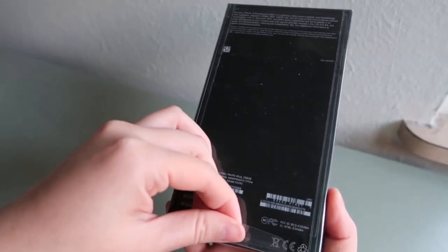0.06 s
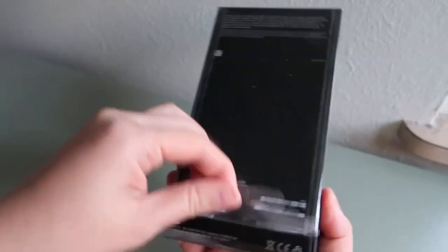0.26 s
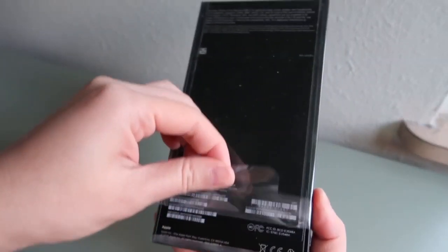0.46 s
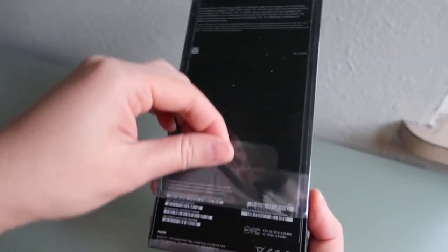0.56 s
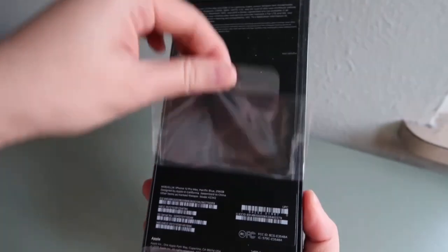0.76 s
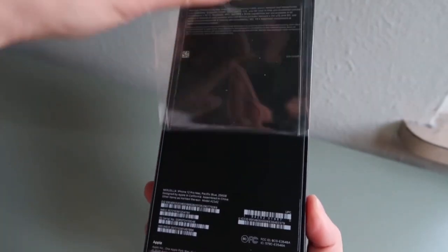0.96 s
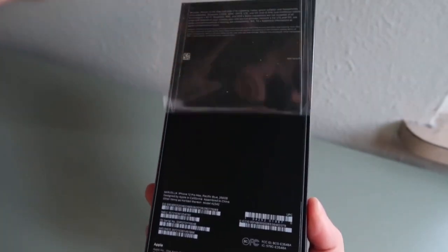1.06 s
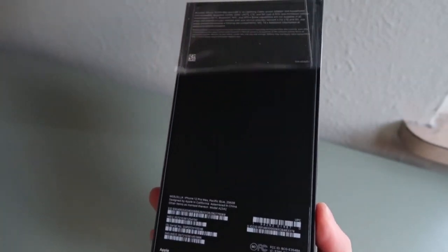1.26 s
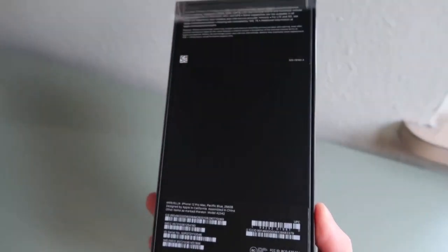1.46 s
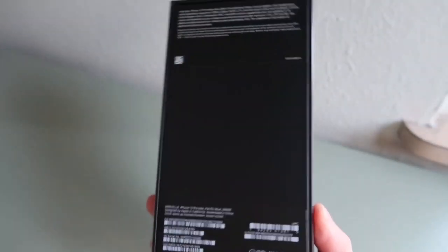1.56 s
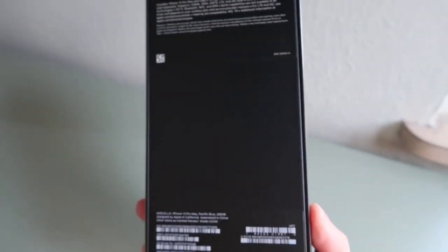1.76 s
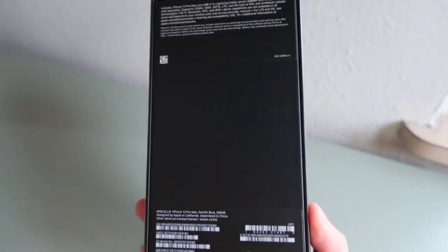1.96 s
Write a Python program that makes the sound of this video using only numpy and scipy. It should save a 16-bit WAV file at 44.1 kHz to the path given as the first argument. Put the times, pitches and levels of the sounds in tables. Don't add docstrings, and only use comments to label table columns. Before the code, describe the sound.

Protective plastic film peels off a small cardboard box, heard close in stereo in a small quiet room. A faint finger brush comes near 0.1 s, then a loud bright snap at 0.23 s and a dull creak. From 0.5 to 1.3 s, irregular sharp ticks ride a soft rustle; a stretching whisper rises to a crackling crunch and low thump at 1.55 s, a slump, then a faint brush near 1.9 s.

```python
import sys
import numpy as np
from scipy import signal
from scipy.fft import rfft, irfft
from scipy.io import wavfile
from scipy.ndimage import uniform_filter1d

SR = 44100
rng = np.random.default_rng(int(sys.argv[2]) if len(sys.argv) > 2 else 0)


def boost_factor(decibels):
    exponent = np.asarray(decibels, float) / 20
    return 10 ** exponent


def wrap_up_sound(samples):
    columns = np.atleast_2d(samples).T
    tamed = np.clip(columns, -1, 1)
    steps = np.round(tamed * 32767).astype(np.int16)
    wavfile.write(sys.argv[1], SR, steps)


N = 88200
HZ = np.arange(N + 1) * SR / (2 * N) + 1

# start in
# seconds, peak level in dB, film pitch in Hz, second pitch in Hz, treble in dB.
PEEL_CRACKS = [(0.2289, -29.5, 8200, 6050, -11), (0.2329, -6, 3030, 4200, -17),
               (.2360, -0.5, 6060, 3890, -24), (0.2427, -3, 4000, 7220, -12), (0.2468, -4, 3220, 2050, -13),
               (.2495, -9, 3050, 2170, -13), (.2512, -13, 1045, 1950, -14), (0.257, -50, 2000, 3200, -14),
               (0.263, -37, 3200, 1820, 0), (0.2761, -22, 1120, 3180, -30), (0.3303, -26, 4690, 950, -14.5),
               (0.3558, -29, 3180, 4460, -24), (.3700, -21, 3280, 3300, -37),
               (0.4683, -18, 3090, 2150, -16.5), (0.4899, -21, 2210, 3120, -11),
               (0.5639, -27.5, 4000, 4200, -16), (0.6094, -32, 3300, 4270, -3.5),
               (0.6253, -19.5, 3470, 4230, -14), (0.6762, -16.5, 3540, 2480, -8.5),
               (0.685, -17, 3140, 2640, -14), (0.7449, -28.5, 2170, 3650, -3.5),
               (0.8113, -11.5, 2660, 3550, -16), (0.8109, -18, 1510, 4060, -16),
               (0.838, -36, 2820, 2200, -19.5), (.9214, -11, 2810, 3520, -14.5),
               (.9317, -13, 3450, 2590, -10), (0.9358, -18.5, 3300, 2850, -9.5),
               (1.006, -23.5, 5100, 7670, -10), (1.0492, -13, 3800, 2450, -9),
               (1.0503, -25.5, 6000, 910, -11.5), (1.1, -19, 5530, 6140, -8),
               (1.1493, -12.5, 2970, 5500, -13), (1.162, -21, 3030, 4330, -11),
               (1.171, -21.5, 4380, 2770, -4), (1.2409, -30, 4600, 3000, -2.5),
               (1.2546, -14.5, 2970, 5400, -10.5), (1.2718, -23, 4650, 2990, -7)]
# start in seconds, peak level in dB, film pitch in Hz,
# second pitch in Hz, treble in dB.
CRUNCH_CRACKS = [(1.5054, -27, 2016, 1084, -21.5), (1.5129, -18, 4350, 5940, -13),
                 (1.5175, -15.5, 2360, 5225, -12), (1.5257, -8, 2425, 4280, -20),
                 (1.5311, -13.5, 1136, 2175, -31), (1.543, -22, 1858, 919, -31),
                 (1.5499, -18, 2760, 5370, -19), (1.5566, -11.5, 5390, 667, -27.5),
                 (1.5617, -14.5, 1660, 1100, -35.5), (1.5676, -8.5, 2950, 4070, -22.5),
                 (1.5694, -9.5, 970, 2120, -25.5), (1.577, -6.5, 3794, 1940, -27),
                 (1.5868, -14, 3820, 5600, -10), (1.5916, -23.5, 3660, 2510, -23),
                 (1.612, -23, 1010, 2400, -31), (1.6237, -22.5, 560, 2130, -40),
                 (1.6532, -23.5, 750, 570, -38.5), (1.660, -25.5, 565, 1700, -45)]
# frequency in Hz, level in dB.
FILM_COLOUR = [(300, -60.5), (700, -29), (1400, -1.5), (2500, 5), (4500, 2), (7000, 1), (10000, -46.5)]
# time in seconds, delay in seconds.
DESK_ECHO = [(.2, 0.0073), (.8, .0085), (1.05, 0.011), (1.16, 0.015), (1.25, 0.02)]
# time in seconds, level in dB.
PEEL_PULL = [(.47, -90), (.52, -81.5), (.6, -91), (.7, -72.5), (0.76, -69), (0.845, -59), (.9, -66.5),
             (0.974, -67), (1.058, -60), (1.212, -61.5), (1.3, -64.5), (1.4, -69), (1.5, -68.5)]
# frequency in Hz, level in dB per Hz.
RUSTLE_COLOUR = [(20, -17.5), (45, -0.5), (136, -9), (800, -19), (1400, -20.5), (3500, -19), (8000, -18),
                 (12500, -35)]
# frequency in Hz, width in Hz, level in dB.
FLUTTER_BANDS = [(130, 60, -3), (299, 140, -2.5), (485, 180, 3.5), (610, 240, -0.5)]
# frequency in Hz, width in Hz, level in dB.
STRETCH_BANDS = [(972, 130, -62), (2180, 490, -55.5), (5000, 450, -60), (5800, 650, -57.5),
                 (11500, 2000, -59.5)]
# time in seconds, level in dB.
STRETCH_SWELL = [(1.07, -14.5), (1.42, -7.5), (1.49, 3)]
# time in seconds, level in dB.
CRUNCH_FORCE = [(1.5, -42.5), (1.526, -15), (1.546, -21.5), (1.57, -7), (1.61, -38.5)]
# frequency in Hz, level in dB per Hz.
CRUNCH_COLOUR = [(24, -40), (40, -6.5), (850, -8), (1400, -7), (3000, -10), (6000, -15.5), (12800, -25.5),
                 (16000, -53.5)]
# frequency in Hz, width in Hz, level in dB.
BOX_MODES = [(109.8, 79, -4.5), (278, 48, 0.5), (559.7, 60, 6), (711, 100, 2), (1032, 60, 8.5),
             (1650, 150, -7.5), (2067, 100, 5.5)]
# time in seconds, level in dB.
SETTLE_FORCE = [(.25, -30), (.28, -48), (.34, -51), (.38, -50.5), (.42, -77)]
# frequency in Hz, level in dB per Hz.
SETTLE_COLOUR = [(300, -29.5), (600, -2.5), (1100, -1), (1600, -5), (2500, -14)]
# time in seconds, level in dB.
SLUMP_FORCE = [(1.6, -50), (1.62, -33), (1.645, -54), (1.655, -30.5), (1.68, -36), (1.74, -52)]
# frequency in Hz, level in dB per Hz.
SLUMP_COLOUR = [(18, -44), (30, 0.5), (206, -8), (567, -7), (802, -23), (1050, -11.5), (9000, -37),
                (14300, -60.5), (22000, -120)]
# time in seconds, level in dB.
BRUSH_STROKES = [
    [(.055, -78), (.075, -77.5), (.11, -83)],
    [(1.84, -82), (1.88, -75.5), (1.93, -80)],
]
# frequency in Hz, width in Hz, level in dB.
BRUSH_BANDS = [(1100, 183, -9.5), (1700, 760, -4.5), (2130, 1300, -9), (4200, 1700, -9), (186, 29, 0.5)]
# start in seconds, peak level in dB, pitch in Hz.
HAND_KNOCKS = [(0.237, -41.5, 222), (0.244, -45.5, 130), (.256, -49.5, 330), (.272, -61, 162),
               (.376, -43.5, 655), (0.621, -53, 304), (.748, -37.5, 312), (0.752, -42, 120),
               (0.815, -38.5, 111), (0.846, -27.5, 106), (0.844, -34.5, 244), (1.557, -23, 45.3),
               (1.557, -54.5, 118), (1.616, -37.5, 562), (1.641, -32.5, 44.3), (1.655, -29.5, 575),
               (1.668, -31.5, 770), (1.68, -37.5, 290)]
# frequency in Hz, time to fall 60 dB in seconds.
ROOM_T60 = [(200, 0.22), (1000, 0.25), (4000, 0.25), (14000, 0.21)]
# frequency in Hz, level in dB per Hz.
HUSH_COLOUR = [(12, -33.5), (20, -7.5), (85, -5), (140, -26), (184, -29), (615, -33), (9280, -49),
               (11200, -35.5), (14000, -70)]
# frequency in Hz, lead of the left in radians.
PORT_PHASE = [(500, -.03), (3700, -.2), (7500, -.5), (9300, -1.5), (14000, -1.75)]

CRACK_RISE_S, CRACK_T60_S, CRACK_DELAY_S, CRACK_FLOOR_HZ = 0.0003, 0.011, 0.0007, 500
RING_T60_S, KICK_T60_S = 0.0074, 0.0015
BROAD_DB, SECOND_DB, TREBLE_DB = -0.5, -4.5, 12
DULL_BELOW_HZ = 2500
FIRST_CLICK = 4.1
DESK_ECHO_DB = -16.5
AFTER_DB, AFTER_PER_S, AFTER_T60_S = -32, 450, 0.15
RUSTLE_DB, RUSTLE_GRAINS_PER_S = 11, 5600
CRUNCH_DB, CRUNCH_GRAINS_PER_S = -11, 2500
KNOCK_T60_S, KNOCK_RISE_S = 0.044, 0.0023
ROOM_DB, ROOM_START_S, ROOM_SIDE_DB, ROOM_CUT_HZ = -11.5, 0.002, 3, 11800
HUSH_DB, HUSH_SIDE_DB = -63, -0.5
DUCK_DB, DUCK_ABOVE_DB, DUCK_RECOVER_DB_PER_S = 17, -34, 45
PORT_CORNER_HZ, PORT_BASS_DB = 5770, -18
CRACK_SIDE_DB, BOX_SIDE_DB, QUIET_SIDE_DB = -7, -16.5, -9.5


def cracks(table):
    out, t = np.zeros(N + SR), np.arange(1024) / SR
    rise = 1 - np.exp(-t / CRACK_RISE_S)
    shape = rise * boost_factor(-60 * t / CRACK_T60_S)
    kick = rise * boost_factor(-60 * t / KICK_T60_S)
    film = boost_factor(at_hz(FILM_COLOUR, np.arange(513) * SR / 1024 + 1))
    high = signal.butter(2, [6200, 15500], "band", fs=SR, output="sos")
    width = np.log(1000) / np.pi / RING_T60_S
    click = FIRST_CLICK * (np.arange(1024) == 16)
    noises = rng.standard_normal((len(table), 3, 1024)) + click
    for (s, db, hz, second_hz, treble_db), noise in zip(table, noises):
        broad = peak_one(irfft(rfft(noise[0]) * film) * shape)
        edge = peak_one(signal.sosfilt(high, noise[2] * shape ** 0.9))
        first, second = [peak_one(resonance(resonance(noise[1] * kick, f, width), f, f))
                         for f in (hz, second_hz)]
        body = boost_factor(BROAD_DB) * min(1, hz / DULL_BELOW_HZ) ** 2 * broad + first + boost_factor(SECOND_DB) * second
        burst = boost_factor(db) * (peak_one(body) + boost_factor(treble_db + TREBLE_DB) * edge)
        echo_s = np.interp(s, *np.transpose(DESK_ECHO))
        for lag, gain in (0, 1), (echo_s, boost_factor(DESK_ECHO_DB)):
            i = int((s + lag + CRACK_DELAY_S) * SR)
            out[i:i + 1024] += gain * burst
    return signal.sosfilt(signal.butter(2, CRACK_FLOOR_HZ, "high", fs=SR, output="sos"), out[:N])


def aftercrackle():
    t, fade = np.arange(N) / SR, 0
    for s, db, *_ in PEEL_CRACKS:
        fade = fade + boost_factor(db - 60 * np.maximum(t - s, 0) / AFTER_T60_S) * (t > s + .004)
    return boost_factor(AFTER_DB) * fade * colour(grains(AFTER_PER_S, spread_db=-1.5), FILM_COLOUR)


def rustle():
    slips = colour(grains(RUSTLE_GRAINS_PER_S, spread_db=2.0), RUSTLE_COLOUR + [(15000, -64)])
    slips = boost_factor(RUSTLE_DB + 2.7 * drift(11.8)) * slips
    peel = curve(PEEL_PULL) * (slips + whisper(FLUTTER_BANDS, patchy_db=5.5))
    return peel + curve(STRETCH_SWELL) * whisper(STRETCH_BANDS, patchy_db=1.0)


def crunch():
    crumple = colour(grains(CRUNCH_GRAINS_PER_S, spread_db=2.0), CRUNCH_COLOUR)
    ringing = sum(boost_factor(db) * resonance(crumple, hz, width) for hz, width, db in BOX_MODES)
    return boost_factor(CRUNCH_DB) * curve(CRUNCH_FORCE) * (crumple + ringing)


def creaks():
    settle = curve(SETTLE_FORCE) * colour(grains(1100, spread_db=4.0), SETTLE_COLOUR)
    brush = sum(map(curve, BRUSH_STROKES)) * whisper(BRUSH_BANDS, patchy_db=3.0)
    slump = boost_factor(-6) * curve(SLUMP_FORCE) * colour(grains(2500, spread_db=0.5), SLUMP_COLOUR)
    return settle + brush + slump


def knocks():
    out, t = np.zeros(N), np.arange(N) / SR
    for s, db, hz in HAND_KNOCKS:
        u = np.maximum(t - s, 0)
        envelope = boost_factor(db - 60 * u / KNOCK_T60_S) * (1 - np.exp(-u / KNOCK_RISE_S))
        out += envelope * np.sin(2 * np.pi * hz * u)
    return out


def room(x):
    t, edges, tail = np.arange(SR // 2) / SR, 60 * 2. ** np.arange(9), 0
    for low, high in zip(edges, edges[1:]):
        octave = signal.butter(2, [low, high], "band", fs=SR, output="sos")
        band = signal.sosfilt(octave, rng.standard_normal((2, len(t))))
        tail = tail + band * boost_factor(-60 * t / at_hz(ROOM_T60, np.sqrt(low * high)))
    tail = tail * (1 - np.exp(-(t / ROOM_START_S) ** 2))
    tail = tail / np.sqrt(np.sum(tail[0] ** 2))
    mid, side = boost_factor(ROOM_DB) * signal.fftconvolve(tail, x[None], axes=1)[:, :N]
    dull = signal.butter(5, ROOM_CUT_HZ, fs=SR)
    return apart(*signal.lfilter(*dull, [mid, boost_factor(ROOM_SIDE_DB) * side]))


def hush(loud):
    mid = colour(rng.standard_normal(N), HUSH_COLOUR)
    side = above(130, colour(rng.standard_normal(N), HUSH_COLOUR))
    return boost_factor(HUSH_DB) * duck(loud) * (mid + boost_factor(HUSH_SIDE_DB) * side * [[1], [-1]])


def duck(loud):
    ramp = DUCK_RECOVER_DB_PER_S * np.arange(N) / SR
    over = np.clip(20 * np.log10(np.abs(loud) + 1e-9) - DUCK_ABOVE_DB, 0, DUCK_DB)
    return boost_factor(-uniform_filter1d(np.maximum.accumulate(over + ramp) - ramp, size=800))


def apart(mid, side):
    side = boost_factor(PORT_BASS_DB) * side + above(PORT_CORNER_HZ, side)
    return np.array([mid + side, mid - side])


def ports(x):
    turn = np.exp(.5j * at_hz(PORT_PHASE, HZ) * np.array([[1], [-1]]))
    return irfft(rfft(x, 2 * N) * turn)[:, :N] * boost_factor(np.array([[-.2], [.2]]))


def above(hz, x):
    return signal.lfilter(*signal.butter(2, hz, "high", fs=SR), x)


def peak_one(x):
    return x / np.abs(x).max()


def curve(rows):
    s, db = np.transpose(rows)
    s = np.r_[s[0] - .03, s, s[-1] + .06]
    db = np.r_[db[0] - 30, db, db[-1] - 30]
    return boost_factor(np.interp(np.arange(N) / SR, s, db, -200, -200))


def at_hz(points, hz):
    table_hz, value = np.transpose(points)
    return np.interp(np.log(hz), np.log(table_hz), value)


def colour(x, spectrum):
    y = irfft(rfft(x, 2 * N) * boost_factor(at_hz(spectrum, HZ)))[..., :N]
    return y / np.sqrt(np.mean(y ** 2))


def resonance(x, hz, width):
    r = np.exp(-np.pi * width / SR)
    poles = [1, -2 * r * np.cos(2 * np.pi * hz / SR), r * r]
    return signal.lfilter(np.array([1, 0, -1]) * (1 - r * r) / 2, poles, x)


def grains(per_s, spread_db):
    size = boost_factor(spread_db * np.minimum(rng.exponential(1, N), 4)) * rng.standard_normal(N)
    return size * (rng.random(N) < per_s / SR)


def drift(rate):
    r = np.exp(-2 * np.pi * rate / SR)
    x = signal.lfilter([1], [1, -2 * r, r * r], rng.standard_normal(N + SR))[SR:]
    return x / x.std()


def whisper(bands, patchy_db):
    out = 0
    for hz, width, db in bands:
        band = resonance(resonance(rng.standard_normal(N), hz, width), hz, width)
        out = out + boost_factor(db + patchy_db * drift(32)) * band / band.std()
    return out


def scene():
    table = PEEL_CRACKS + CRUNCH_CRACKS
    box = cracks(table) + rustle() + crunch() + creaks() + aftercrackle() + knocks()
    direct = ports(box)
    direct = direct + apart(0, boost_factor(CRACK_SIDE_DB) * cracks(table))
    direct = direct + apart(0, boost_factor(BOX_SIDE_DB) * np.roll(box, 40))
    direct = direct + boost_factor(QUIET_SIDE_DB) * above(160, rustle() + creaks()) * [[1], [-1]]
    return direct + room(box) + hush(box)


def low_pass(x):
    return signal.sosfilt(signal.butter(12, 16980, fs=SR, output="sos"), x)


def record(dry):
    x = signal.sosfilt(signal.butter(8, 14900, fs=SR, output="sos"), dry)
    return low_pass(np.clip(x, -1, 1))


dry = scene()
out = record(dry)
wrap_up_sound(out)
```